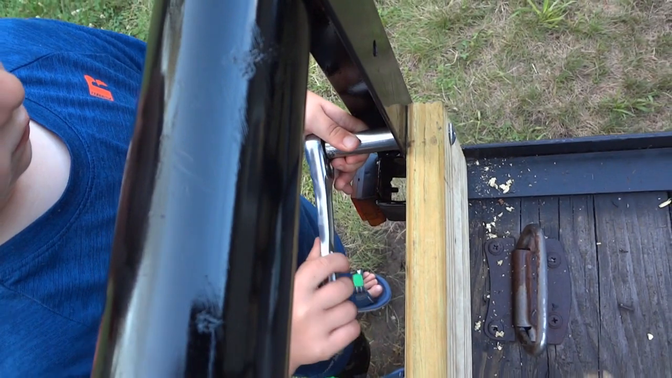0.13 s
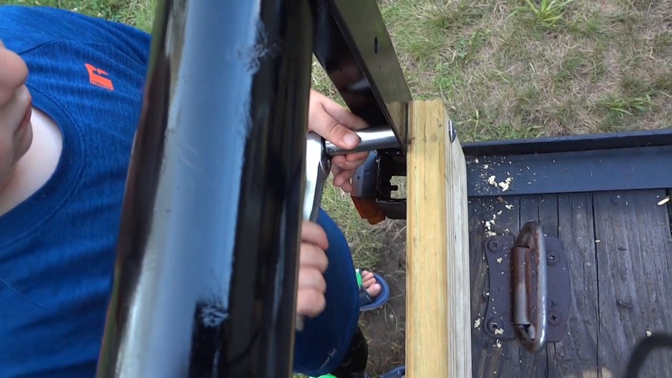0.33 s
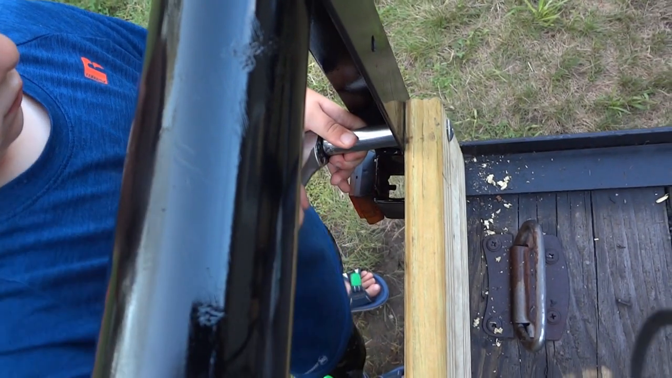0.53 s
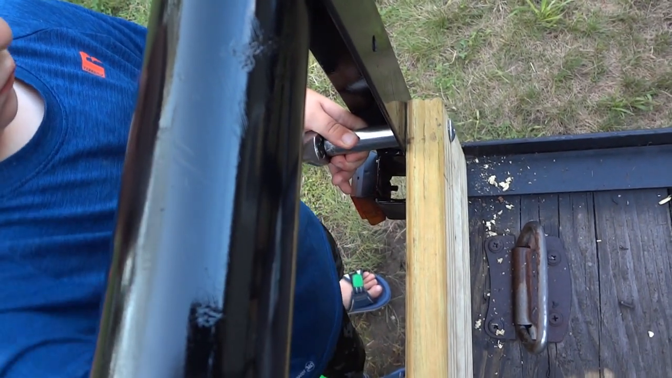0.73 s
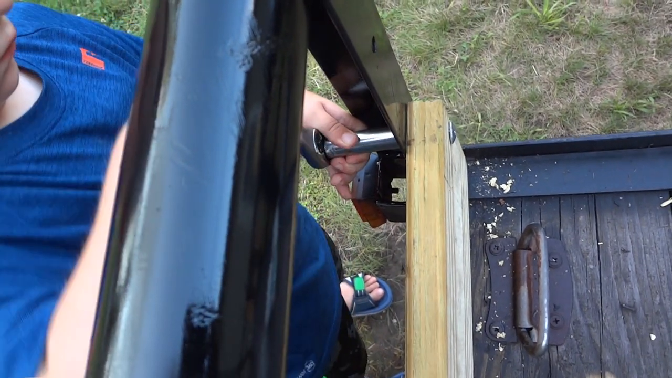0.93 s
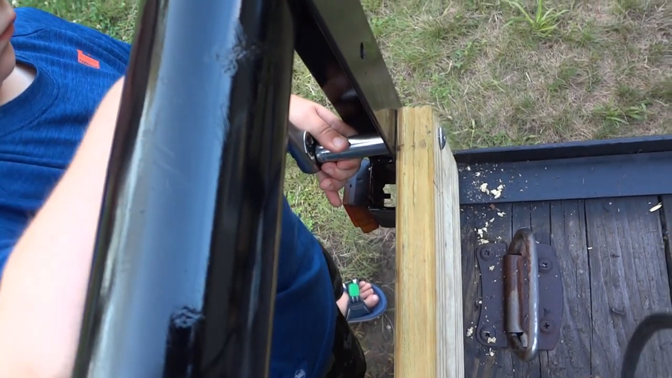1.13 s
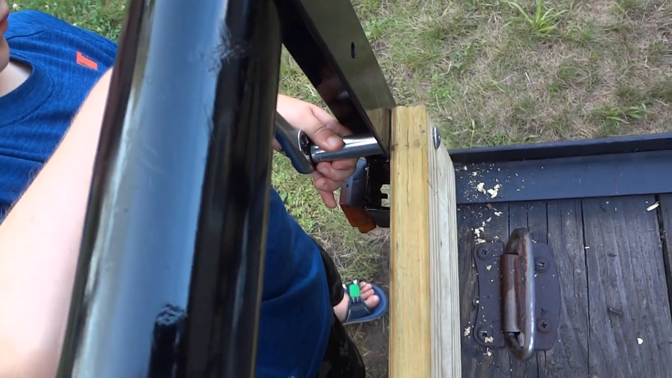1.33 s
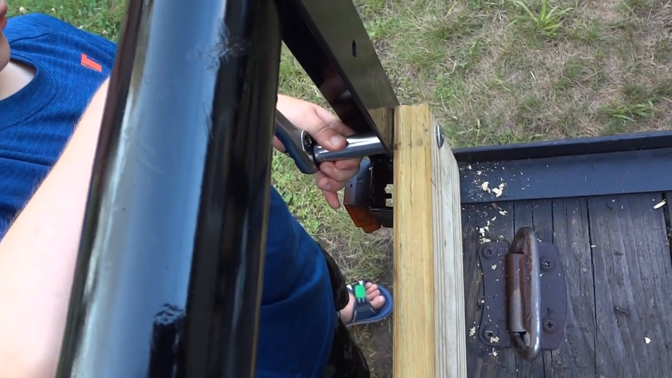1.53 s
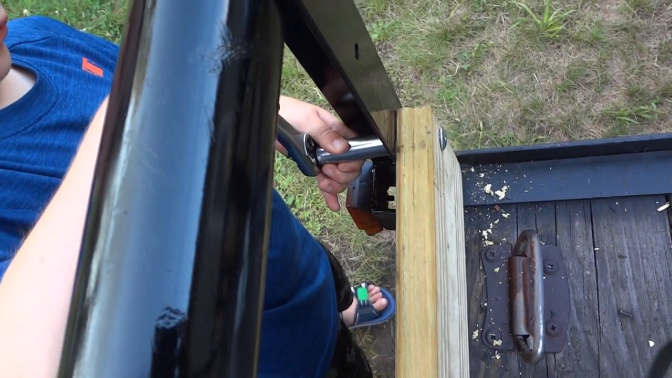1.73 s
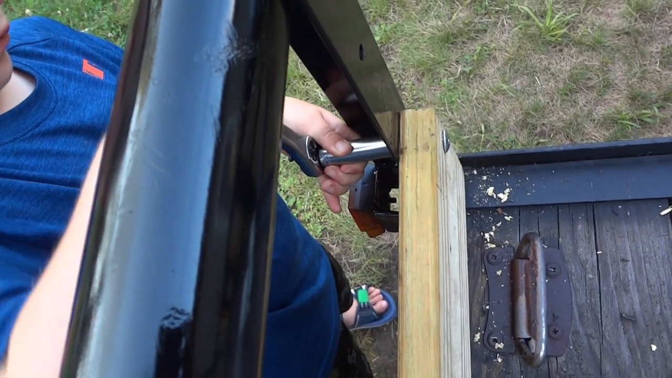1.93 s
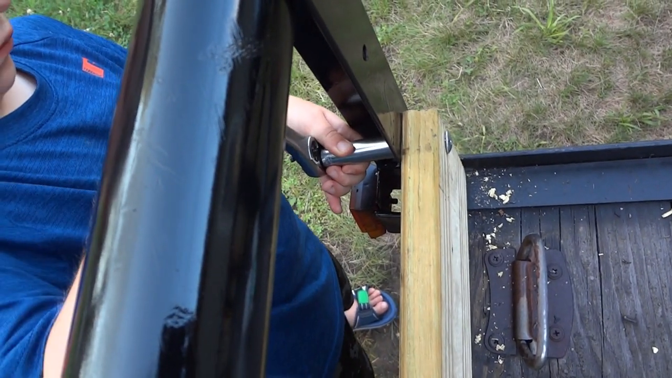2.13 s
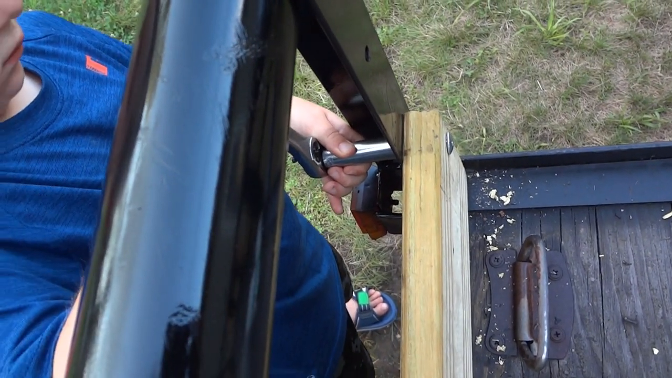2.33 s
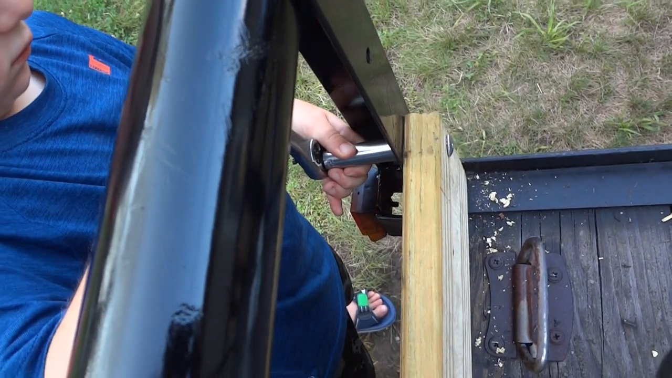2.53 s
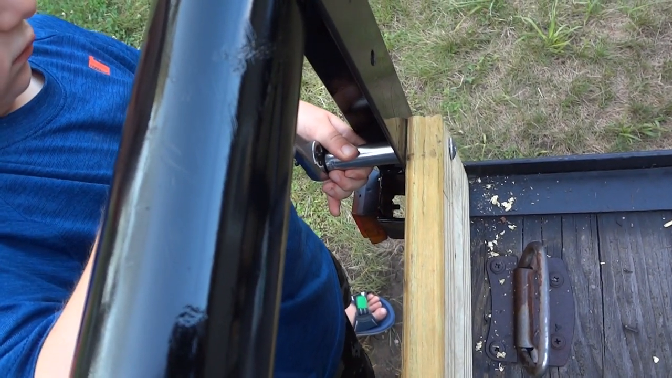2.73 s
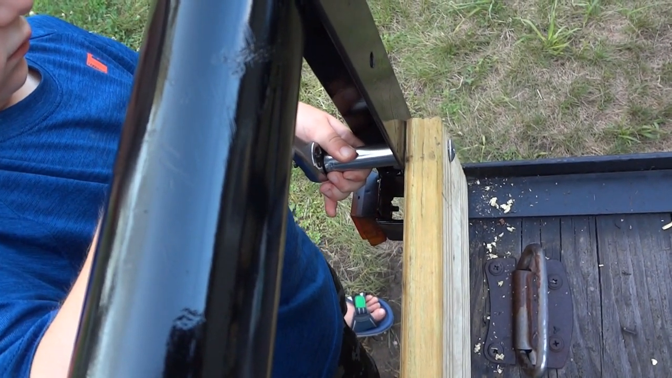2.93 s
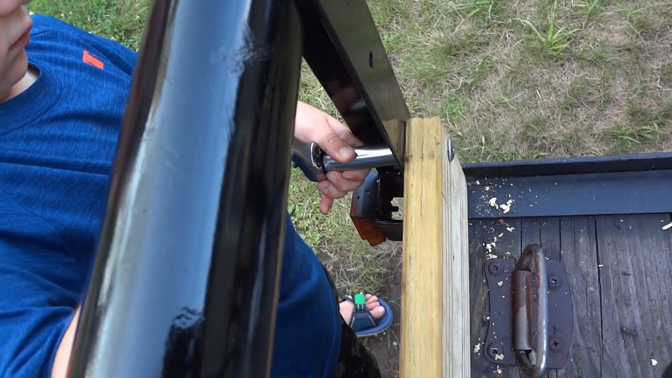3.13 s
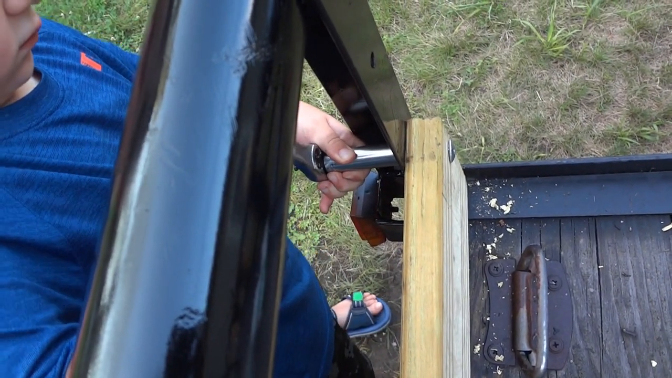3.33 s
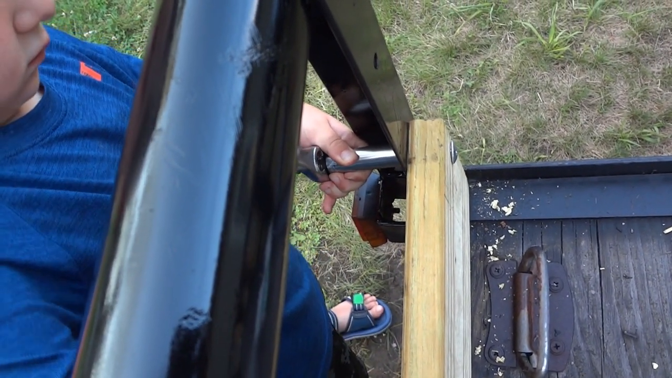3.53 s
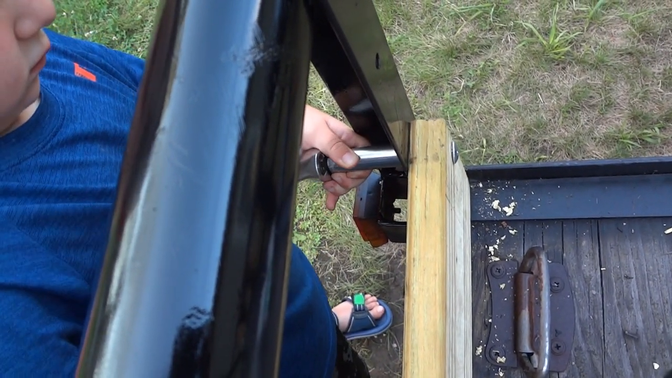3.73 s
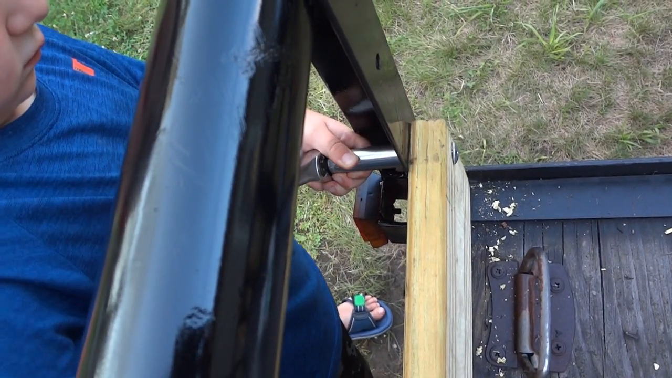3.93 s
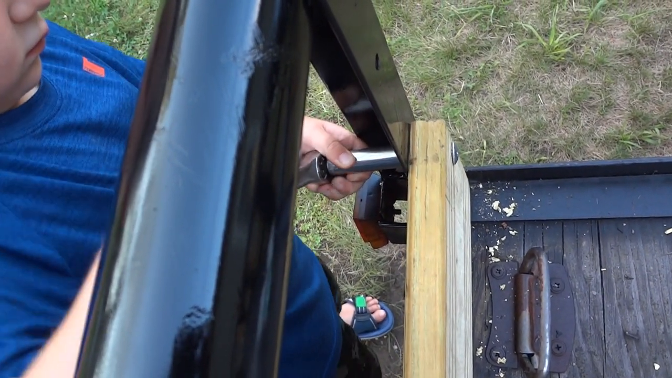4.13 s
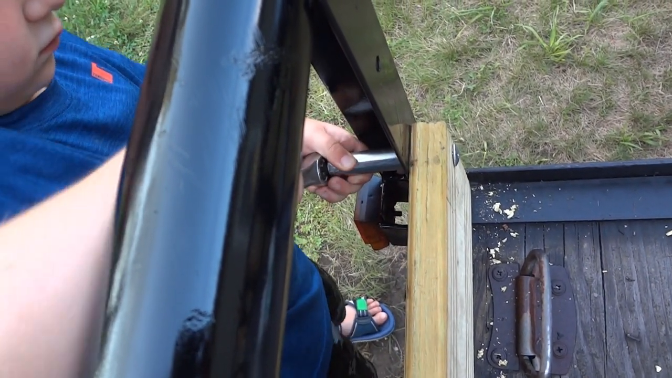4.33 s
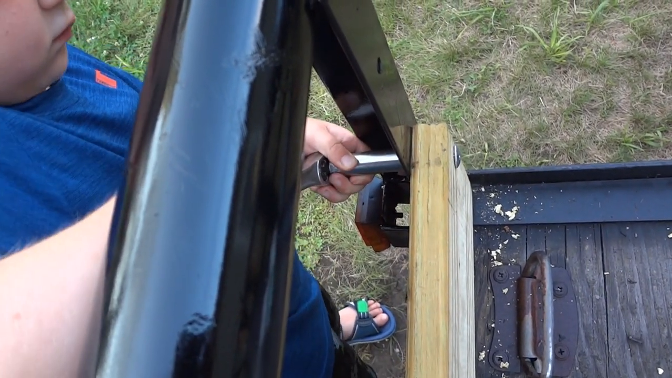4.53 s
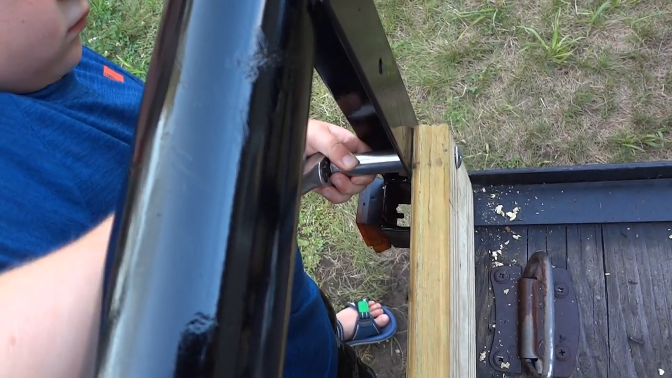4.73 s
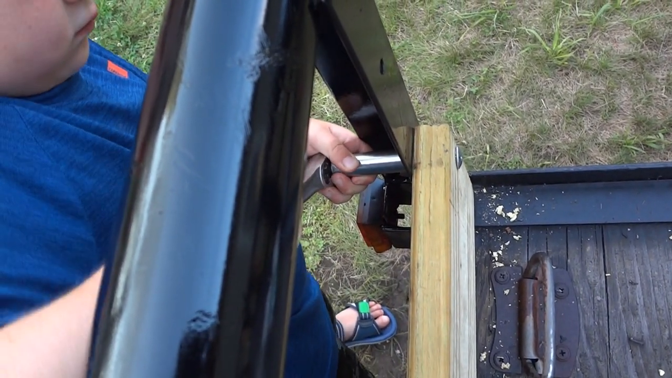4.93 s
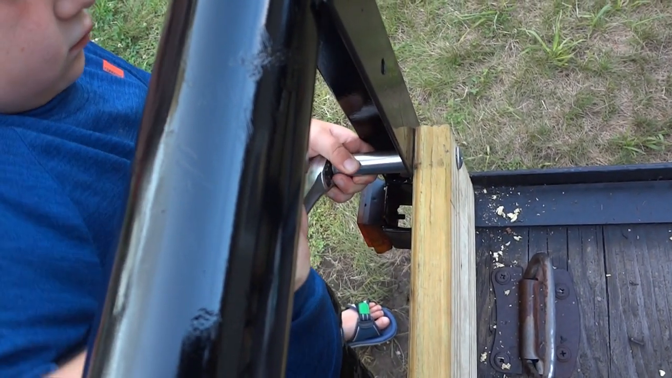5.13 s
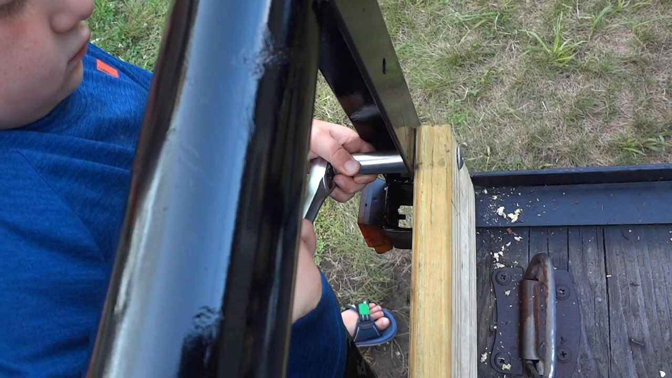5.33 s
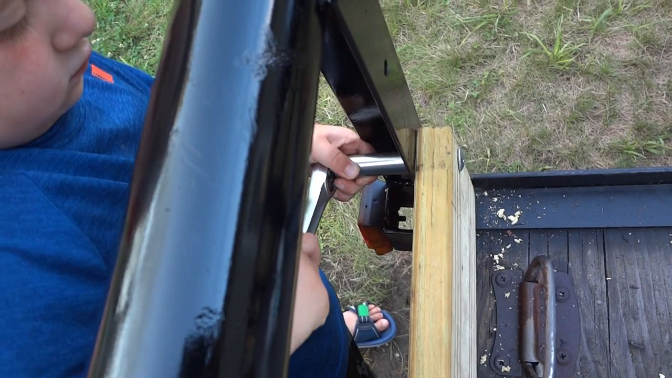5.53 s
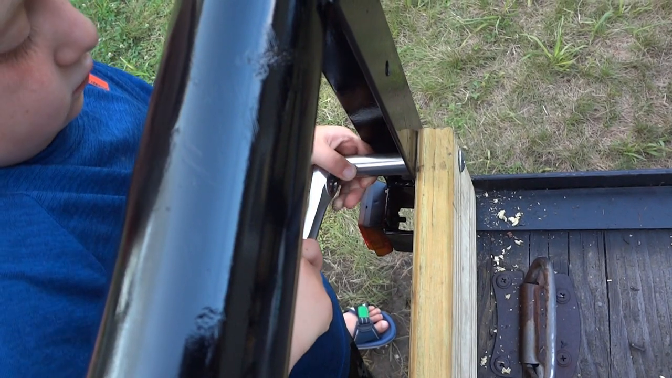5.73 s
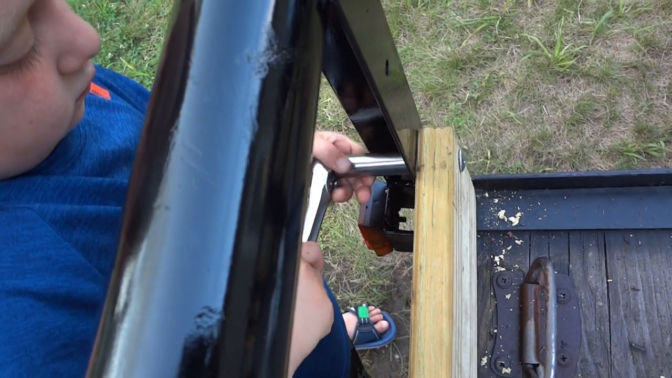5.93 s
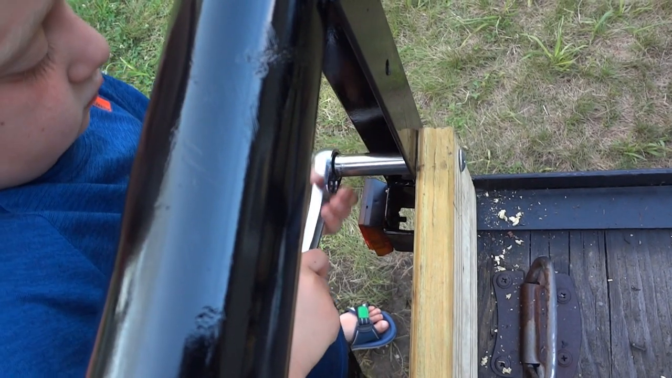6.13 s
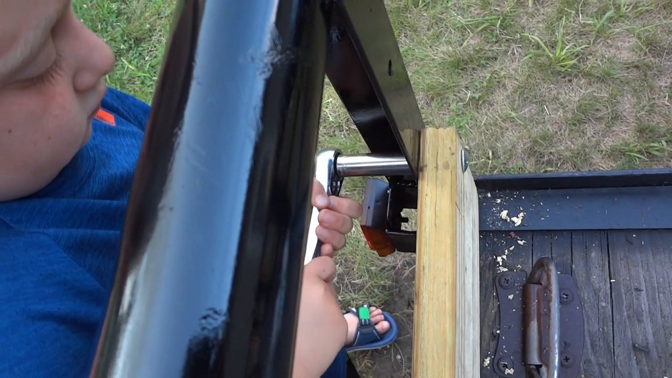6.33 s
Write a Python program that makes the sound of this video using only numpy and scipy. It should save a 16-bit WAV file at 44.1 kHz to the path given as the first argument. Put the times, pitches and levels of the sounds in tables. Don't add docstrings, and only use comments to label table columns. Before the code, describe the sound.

Outdoors, near a small stereo microphone, a ratchet wrench swings back on a bolt in a steel trailer frame. A click is already sounding at 0 seconds, another comes at 0.16, then they run about ten a second until 1.13, with a final separate click at 1.5. Each is a hard, bright snap of the wrench head, followed by a short frame ring and dense rattle, with quick echoes off deck and ground; tone varies with each click. Then it is quiet over faint far air hum, circuit hiss and thin unsteady whines. Around 2.0 come small dry taps and a bright little tick with a skin rub; a very soft rub near 3.1, a tick at 3.7. From 4.14 to 4.25 a tiny lens motor flutters in seven rapid steps. A barely audible touch follows at 4.5, and two faint dull taps near 6.0.

```python
import sys
import numpy as np
from scipy import signal
from scipy.fft import rfft, irfft, next_fast_len
from scipy.io import wavfile
from scipy.ndimage import uniform_filter1d, map_coordinates

SR = 44100
rng = np.random.default_rng(int(sys.argv[2]) if len(sys.argv) > 2 else 0)


def transcribe(u):
    v = np.clip(np.atleast_2d(u).T, -1, 1)
    q = np.round(v * 32767).astype(np.int16)
    wavfile.write(sys.argv[1], SR, q)


def voltage_ratio(decibels):
    exponent = np.asarray(decibels, float) / 20
    return 10 ** exponent


N = 286429


def ratchet():
    # start in seconds, snap peak in dB, handle turned towards the microphone [0-1],
    # socket seated on the nut [0-1], pitch of the loaded bar in Hz.
    pawl_drops = [(-.005, -13, 0.34, 0.67, 1097), (0.1579, -14, 0.09, 0.59, 1150),
                  (0.2742, -14, 0.33, .75, 1060), (0.3519, -13.5, 0.12, 0.12, 1710),
                  (0.4268, -13, 0.21, 0.28, 2150), (0.5045, -13.5, 0.5, 0.45, 1540),
                  (0.5893, -14, 0.45, 0.7, 1247), (0.6852, -13.5, 0.52, 0.37, 2400),
                  (0.7946, -14, 0.97, 0.48, 2320), (0.912, -15, 0.96, 0.52, 2030),
                  (1.0152, -14, .95, 0.65, 2030), (1.132, -15, 0.83, 0.91, 1510),
                  (1.502, -16, 0.6, 0.44, 1490)]
    # frequency in Hz, level in dB with the handle turned away and the socket loose,
    # gain in dB by turning, gain in dB by seating.
    drop_colour = [(1020, -36.5, -3, 9), (2210, -41, 5, 23), (4700, -21.5, 22.5, -1.2),
                   (8000, -26, 11.5, 4), (10990, -0.8, -1, -1.4)]
    # frequency in Hz, left-right likeness [-1 to 1].
    click_alike = [(300, 1), (1300, 0.86), (2400, 0.94), (4400, 0.94), (15000, 0.95)]
    track = np.zeros((2, N + 2 * SR))
    t = np.arange(SR // 2) / SR
    for s, db, turn, seat, bar_hz in pawl_drops:
        colour = [(hz, loose_db + turn * turn_db + seat * seat_db)
                  for hz, loose_db, turn_db, seat_db in drop_colour]
        body = [(hz, 0.5 * level) for hz, level in colour]
        lift = frame_lift(turn, seat, bar_hz)
        frame = frame_ring(t, body, lift) + frame_rattle(t, body, lift)
        add(track, voltage_ratio(db - 5.0) * (head_snap(t, colour) + voltage_ratio(-0.2) * frame), s)
    return stereo(track, [(100, 3), (400, 2.5)], click_alike)[:, SR:SR + N]


def head_snap(t, colour):
    # frequency in Hz, level in dB, t60 in seconds.
    head_modes = [(2400, 7, 0.021), (4600, 14, 0.0051), (5310, 10, 0.006), (6325, 9, 0.0087),
                  (7900, 17.5, 0.0069), (9000, -10, 0.021), (10300, 2, 0.0034), (11250, 5.5, 0.0098),
                  (13150, 0.5, 0.011), (15300, -10, 0.012), (14660, 1, 0.0083)]
    # delay in seconds, level in dB.
    echoes = [
        (.0065, -26),
        (0.021, -9.5),
        (.026, -11.5),
        (0.035, -18),
    ]
    ring = ringing(head_modes, t, colour, scatter_db=2, attack=0.0006, rise_cycles=0)
    noise = filtered(rng.standard_normal((2, len(t))), lambda f: voltage_ratio(along(colour, f)))
    burst = voltage_ratio(-60 * t / 0.0061) * (1 - np.exp(-t / 0.00038))
    snap = ring + 3.85 * burst * noise
    snap = 2.13 * snap / np.abs(snap[0]).max()
    for lag, echo_db in echoes:
        back = ringing(head_modes, t, colour, scatter_db=2.5, attack=0.0028, rise_cycles=0)
        late = np.pad(back, ((0, 0), (round(lag * SR), 0)))[:, :len(t)]
        snap = snap + voltage_ratio(echo_db) * late
    return snap


def frame_lift(turn, seat, bar_hz):
    bar_db = 3.5 + seat * 10.5
    low_db, high_db = -3 + turn * 3.5, 5.5 - turn * 4.5
    return lambda hz: (bar_db * bump(hz, bar_hz, 0.12) + low_db * bump(hz, 4520, 0.013)
                       + high_db * bump(hz, 8660, 0.013))


def frame_ring(t, body, lift):
    modes = ringing(bunches(lift), t, body, scatter_db=4.0, attack=0.011, rise_cycles=6.0)
    hand_damping = voltage_ratio(-4 * (t / 0.26) ** 2)
    return voltage_ratio(-16.5) * modes * hand_damping


def bunches(lift):
    # frequency in Hz, level in dB, t60
    # in seconds, spread in Hz.
    frame_bars = [(465, -13, .2, 12), (590, -14, .2, 12), (800, -16, .13, 40), (920, -12, .15, 15),
                  (1175, -4, .16, 45), (1490, -5, .13, 30), (1642, -10, .2, 12), (1930, -10, .12, 30),
                  (2105, -6, .17, 20), (2405, -5, .14, 20), (2900, -10, .1, 40),
                  (4110, -7, .11, 60), (4496, -3, .26, 11), (4553, -4, .22, 10), (4640, -2, .12, 20),
                 (4760, -4, .11, 30), (5160, -8, .11, 50), (5480, -8, .12, 50), (6150, -8, .11, 100),
                 (7950, -11, .12, 40), (8620, -10, .16, 60), (11110, -16, .095, 80), (13050, -20, .09, 70),
                 (13670, -22, .2, 20), (14850, -21, .085, 120)]
    return [(hz + spread * k, db + lift(hz), t60)
            for hz, db, t60, spread in frame_bars
            for k in rng.standard_normal(3)]


def frame_rattle(t, body, lift):
    # frequency in Hz, level in dB per Hz.
    rattle_spectrum = [(180, -49), (300, -31.5), (938, -19), (1170, -20), (1800, -20.5), (2100, -18),
                       (3530, -20), (4610, -10), (7130, -15.5), (11200, -24.5), (14900, -24), (15500, -23),
                       (16000, -55)]
    # frequency in Hz, t60 in seconds.
    rattle_t60 = [(400, 0.34), (1500, 0.32), (4500, 0.1), (9000, 0.1), (15000, 0.11)]
    hz, frames, z = signal.stft(rng.standard_normal((2, len(t))), SR, nperseg=128)
    near = voltage_ratio(-60 * frames / along(rattle_t60, hz)[:, None])
    yard = voltage_ratio(-16.5 - 60 * frames / 0.5) / (1 + hz[:, None] / 3000)
    patchy_db = 3 * rng.standard_normal(len(hz))
    level = voltage_ratio(along(rattle_spectrum, hz) + along(body, hz) + lift(hz) + patchy_db)
    rattle = signal.istft(z * level[:, None] * (near + yard), SR, nperseg=128)[1][:, :len(t)]
    return voltage_ratio(12.5) * rattle * (1 - np.exp(-t / 0.0053))


def ringing(modes, t, colour, scatter_db, attack, rise_cycles):
    hz, db, t60 = np.transpose(modes)[..., None]
    scatter = scatter_db * rng.standard_normal((2, *hz.shape))
    level = voltage_ratio(db + along(colour, hz) + scatter - 60 * t / t60)
    phase = 2 * np.pi * rng.random((2, *hz.shape))
    rise = 1 - np.exp(-t / (attack + rise_cycles / hz))
    return (level * rise * np.sin(2 * np.pi * hz * t + phase)).sum(1)


def hand():
    # start in seconds, peak in dB, centre in Hz,
    # length in seconds, left over right in dB.
    ticks = [(.758, -34.5, 6500, .004, 2.5), (2.018, -50, 6760, 0.014, 3), (3.539, -63, 4000, .002, 2),
             (3.727, -53.5, 7960, 0.0034, 7), (4.508, -65, 140, 0.075, 2), (6.0125, -60.5, 604, 0.0099, 0),
             (6.06, -61.5, 450, 0.0099, 6)]
    taps = [(.757, -39, 3300, 0.0038, 3.5), (1.09, -60, 7160, .004, 12), (1.609, -61, 7800, .003, 2),
            (2.053, -47, 13200, .007, 2), (2.068, -58, 12500, .005, 0), (6.0122, -58, 3670, 0.0018, 1),
            (6.06, -61, 2320, 0.0032, 0)]
    pings = [(4.559, -73, 4600, .025, 2)]
    # centre in seconds, length in seconds, level in dB,
    # centre in Hz, width in Hz.
    rubs = [(2.04, 0.032, -62, 7200, 3520), (3.06, 0.087, -69, 6000, 4000), (4.564, 0.014, -65, 8000, 9000)]
    track = np.zeros((2, N + 2 * SR))
    t = np.arange(SR // 8) / SR
    for contacts, width in [(ticks, 1.9), (taps, 0.19), (pings, 0.024)]:
        for s, db, hz, length, pan_db in contacts:
            push = rng.standard_normal(len(t)) * voltage_ratio(-30 * t / length)
            tap = filtered(push, lambda f: resonance(hz, width * hz)(f) ** 2)
            sides = voltage_ratio([[pan_db / 2], [-pan_db / 2]])
            add(track, voltage_ratio(db + 7.5) * tap / np.abs(tap).max() * sides, s)
    t = np.arange(N) / SR
    for s, length, db, hz, width_hz in rubs:
        roughness_db = 2.3 * rng.standard_normal(N // 64 + 1).repeat(64)[:N]
        grain = rng.standard_normal(N) * voltage_ratio(roughness_db)
        rub = unit(filtered(grain, lambda f: resonance(hz, width_hz)(f) ** 2))
        stroke = np.exp(-0.5 * ((t - s) / length) ** 2)
        add(track, voltage_ratio(db) * (rub * stroke)[None], 0)
    return track[:, SR:SR + N]


def lens():
    # frequency in Hz, width in Hz, level in dB.
    shell_modes = [(2310, 170, -7.5), (3300, 140, -3), (4600, 600, -4.5), (7740, 790, 1),
                   (11000, 980, -2.5), (12500, 1100, -0.5)]
    kicks, rebounds = np.zeros((2, N))
    for k in range(7):
        s = 4.1443 + k * 0.01678
        if k % 2:
            db, rebound_db = -42.5, -11
        else:
            db, rebound_db = -39 + k * 0.58, -4
        kicks[round(s * SR)] = voltage_ratio(db + 18.0)
        kicks[round((s + 0.0005) * SR)] = voltage_ratio(db - 3)
        rebounds[round((s + 0.00231) * SR)] = voltage_ratio(db + rebound_db + 30.0)

    def shell(f):
        return sum((-1) ** k * voltage_ratio(db) * resonance(centre_hz, width_hz)(f)
                   for k, (centre_hz, width_hz, db) in enumerate(shell_modes))

    bright = filtered(kicks, resonance(7600, 9900))
    dull = filtered(rebounds, lambda f: 1 / (1 + 1j * f / 4500) ** 3)
    return filtered(bright + dull, shell) * voltage_ratio([[2], [-2]])


def air():
    # frequency in Hz, level in dB per Hz.
    air_spectrum = [(15, -25), (30, -25), (95, -5.5), (140, -10), (300, -2), (900, -0.5), (3000, -9),
                    (8800, -17), (12600, -16), (15600, -17), (16000, -39)]
    # frequency in Hz, left-right likeness [-1 to 1].
    air_alike = [(60, 0.46), (130, 0.87), (290, -0.29), (640, -0.61), (1410, -0.52), (3100, -0.16),
                 (6820, 0.66), (15000, 0.86)]
    # frequency in Hz, level in dB rms.
    whine = [(172.3, -84), (5739, -90), (6713, -90), (6772, -89), (7192, -93), (9771, -92), (9830, -90),
             (11526, -94), (12225, -86.5), (12290, -85.5), (12400, -89), (13065, -93), (13485, -84),
             (13905, -89)]
    z = signal.stft(rng.standard_normal((2, N)), nperseg=512)[2]
    patches = uniform_filter1d(rng.standard_normal(z.shape[1:]), 5, 0)
    patches = uniform_filter1d(patches, 12, 1)
    pair = signal.istft(z * voltage_ratio(0.98 * unit(patches)), nperseg=512)[1][:, :N]
    hiss = voltage_ratio(-60.5) * unit(stereo(pair, air_spectrum, air_alike))
    t = np.arange(N) / SR
    tones = 0
    for hz, db in whine:
        knots = rng.standard_normal((2, 200))
        drift = map_coordinates(knots, [[0 * t, 0 * t + 1], [t * 25, t * 25]], order=1)
        tones = tones + voltage_ratio(db + 3 + 3 * drift[0]) * np.sin(2 * np.pi * hz * t + 2.5 * drift[1])
    return hiss + tones


def unit(x):
    return x / np.sqrt(np.mean(x ** 2) + 1e-20)


def along(points, hz):
    f, v = np.transpose(points)
    return np.interp(np.log(hz + 1), np.log(f + 1), v)


def bump(hz, centre_hz, width):
    return np.exp(-(np.log((hz + 1) / centre_hz) / width) ** 2)


def filtered(x, response):
    n = x.shape[-1]
    m = next_fast_len(n + 4096)
    return irfft(rfft(x, m) * response(np.fft.rfftfreq(m, 1 / SR)), m)[..., :n]


def resonance(centre_hz, width_hz):
    return lambda f: 1j * f * width_hz / (centre_hz ** 2 - f * f + 1j * f * width_hz)


def stereo(pair, spectrum, alike):
    def response(hz):
        turn = np.arccos(np.clip(along(alike, hz), -1, 1)) / 2
        return voltage_ratio(along(spectrum, hz)) * [np.cos(turn), np.sin(turn)]

    mid, side = filtered(pair, response)
    return np.array([mid + side, mid - side])


def add(track, sound, s):
    track[:, round((s + 1) * SR):][:, :sound.shape[1]] += sound


def scene():
    return ratchet() + hand() + lens() + air()


def low_pass(x):
    return signal.sosfilt(signal.butter(12, 16860, fs=SR, output="sos"), x)


def record(dry):
    mix = filtered(dry, lambda f: 1 / (1 + (f / 16100) ** 60))
    return low_pass(mix)


dry = scene()
out = record(dry)
transcribe(out)
```